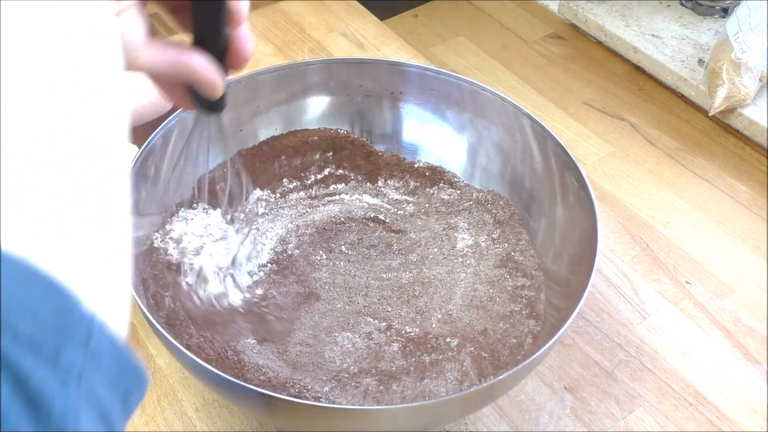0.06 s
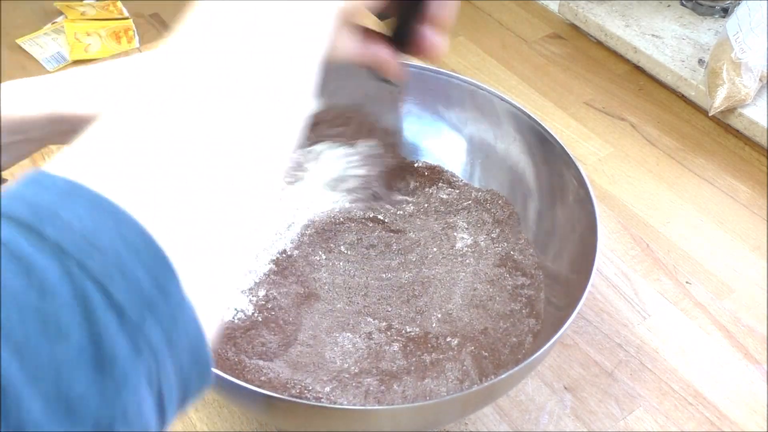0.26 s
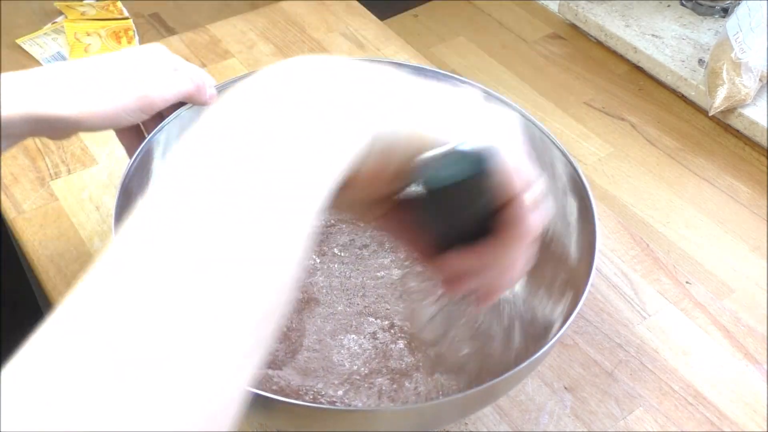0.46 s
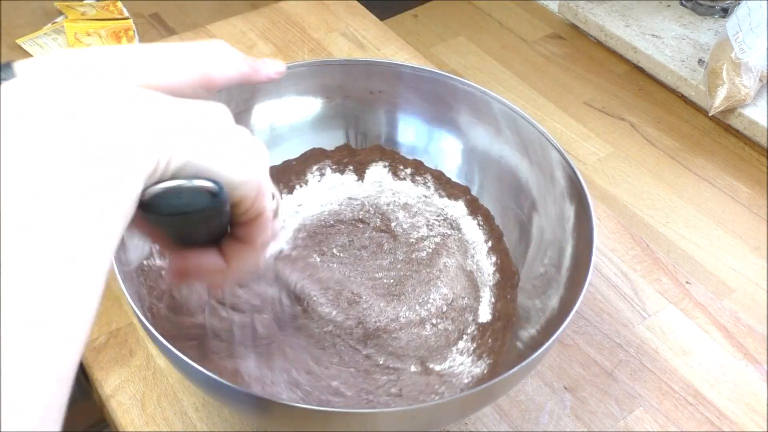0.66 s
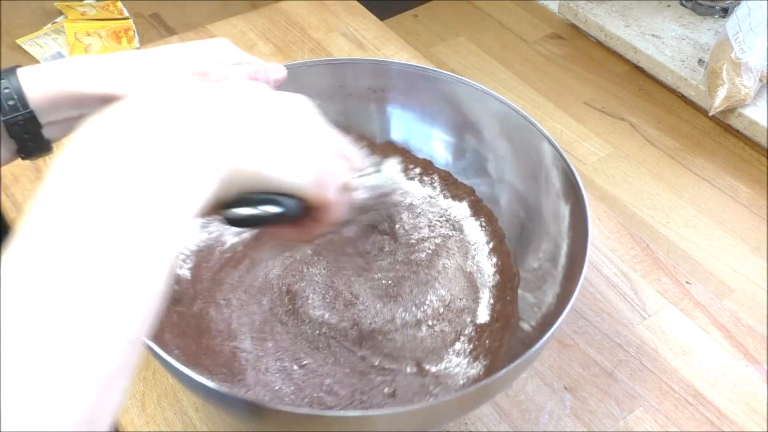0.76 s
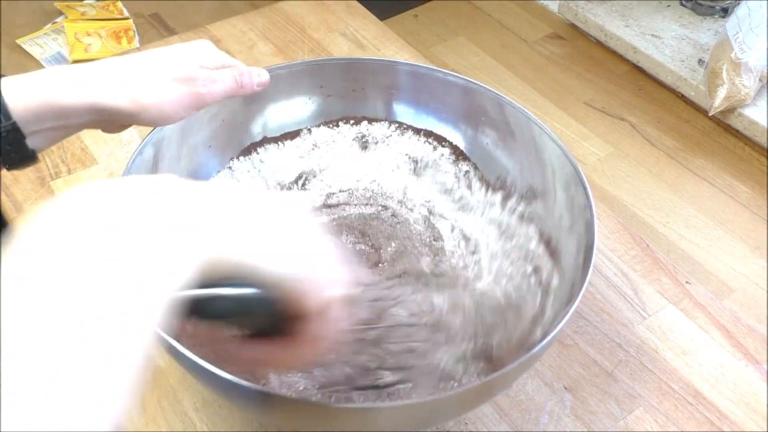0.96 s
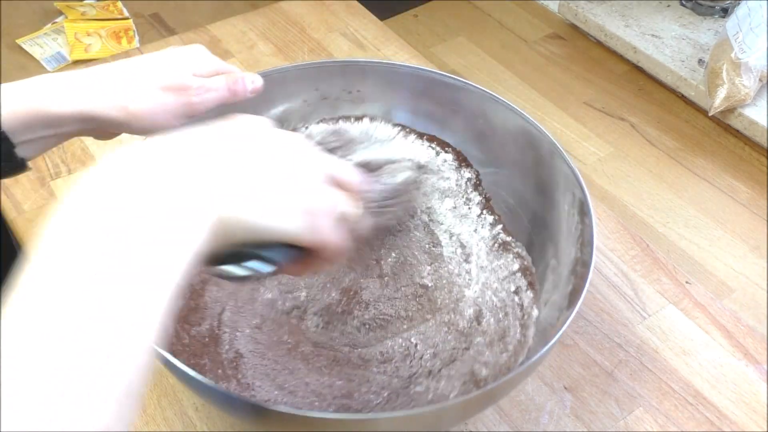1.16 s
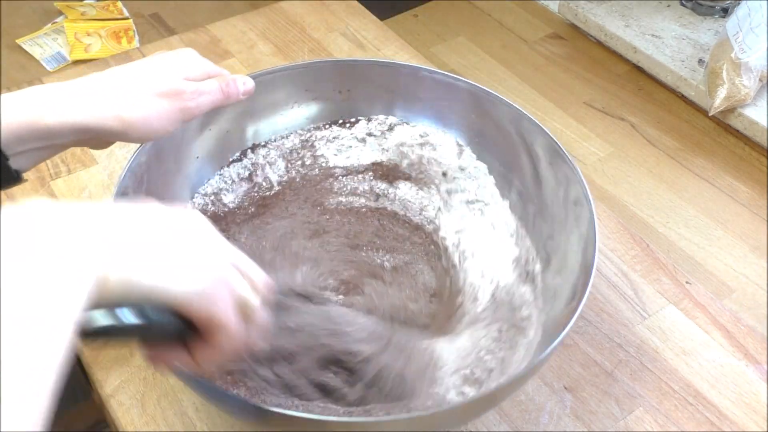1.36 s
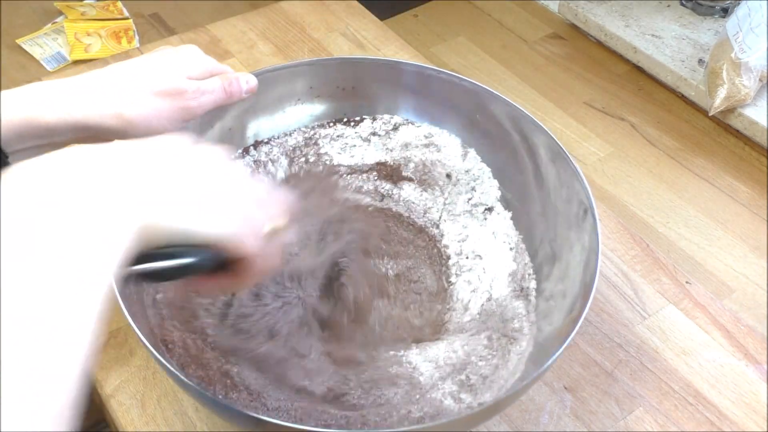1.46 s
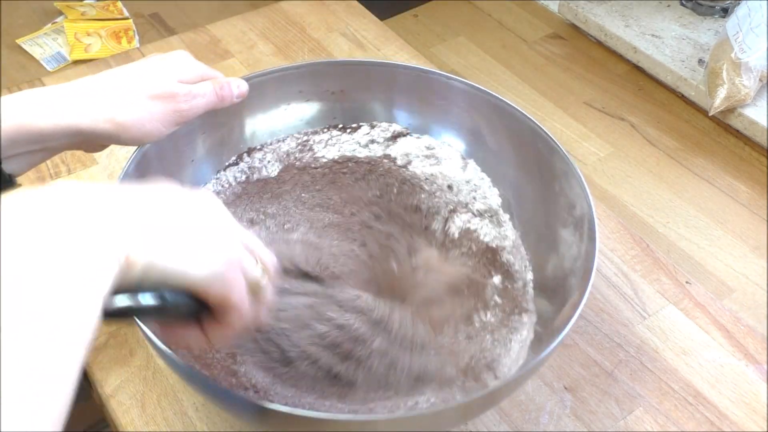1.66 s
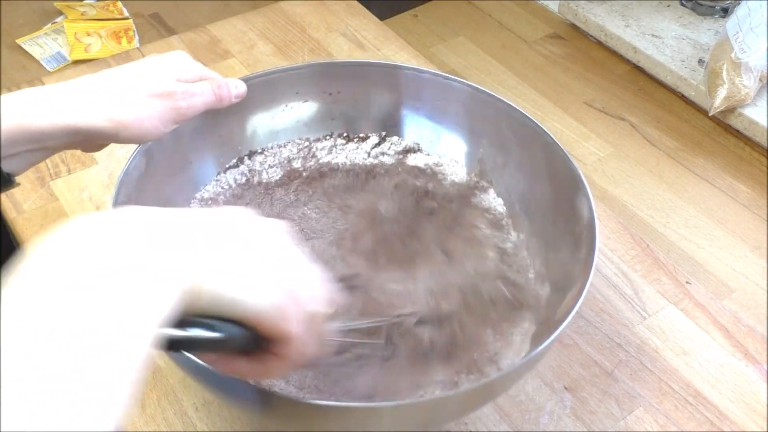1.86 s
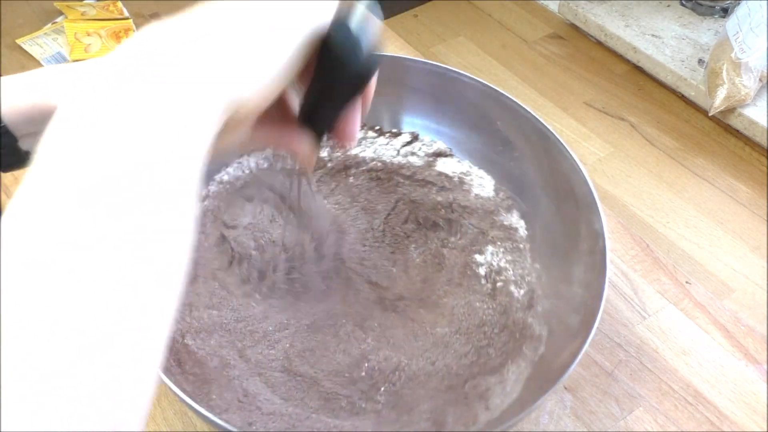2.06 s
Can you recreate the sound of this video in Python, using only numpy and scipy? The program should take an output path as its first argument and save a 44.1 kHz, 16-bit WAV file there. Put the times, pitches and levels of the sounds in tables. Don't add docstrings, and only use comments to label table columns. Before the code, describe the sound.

Close up in a small, quietly humming room, a whisk rasps through dry powder in a metal bowl; light wire ticks lead into fast uneven scrapes, hard clinks, low bowl judders and dull counter thumps, easing at the end.

```python
import sys
import numpy as np
from scipy import signal
from scipy.fft import rfft, irfft
from scipy.io import wavfile
from scipy.ndimage import uniform_filter1d

SR = 44100
rng = np.random.default_rng(int(sys.argv[2]) if len(sys.argv) > 2 else 0)


def invert_db(x):
    u = np.asarray(x, float) / 20
    return 10 ** u


def output_pcm(signal):
    pcm = np.clip(np.atleast_2d(signal).T, -1, 1) * 32767
    wavfile.write(sys.argv[1], SR, np.round(pcm).astype(np.int16))


N = 92610
T = np.arange(N) / SR

# frequency in Hz, level in dB.
KITCHEN_SPECTRUM = [(15, -28), (25, 1.5), (234, -16.5), (298, -4.5), (600, -18.5), (1580, -20), (3450, -26),
                    (6960, -31), (15600, -54)]
# start in seconds, level in dB, panel note in dB relative.
THUMPS = [(0.602, -40.5, 8), (0.697, -37, -9), (0.822, -31, -4.5), (0.888, -39, -4), (0.999, -33.5, 3.5),
          (1.128, -61, 8), (1.2, -43, -15), (1.27, -35.5, 2.5), (1.318, -38, 3), (1.39, -45, -3),
          (1.68, -30.5, 1.5), (1.838, -27, -2.5), (1.923, -32, 6.5), (1.575, -45, 10), (1.71, -28, -7),
          (1.954, -32, 4)]
# start in seconds, hold in seconds, level in dB, pitch in Hz.
JUDDERS = [(0.085, 0.0067, -28, 339), (0.183, 0.041, -37.5, 308.5), (0.394, 0.028, -35.5, 299),
           (0.527, 0.013, -30.5, 363.6), (0.566, 0.13, -23, 300.4), (0.701, 0.02, -24.5, 282),
           (0.748, 0.037, -24, 315), (.785, 0.025, -21, 419), (.79, 0.016, -26, 290),
           (0.854, 0.0055, -20.5, 303), (0.872, 0.016, -21, 333), (0.898, 0.0079, -18.5, 310),
           (0.921, 0.013, -27, 304), (0.992, 0.036, -27.5, 300.6), (1.029, 0.087, -28, 308),
           (1.125, 0.055, -19, 309.4), (1.177, 0.067, -27.5, 319), (1.268, 0.036, -27, 280.5),
           (1.386, 0.049, -30.5, 296), (1.495, 0.019, -27, 338), (1.521, 0.011, -20, 332),
           (1.56, 0.031, -29.5, 307), (1.62, 0.03, -28, 301), (1.678, 0.016, -18, 296),
           (1.724, 0.032, -33, 285), (1.758, 0.048, -24.5, 376), (1.837, 0.038, -17.5, 289),
           (1.917, 0.013, -20, 316), (1.956, 0.039, -33, 320)]
# start in seconds, level in dB, pitch in Hz, hold in seconds.
TICKS = [(.137, -17, 6580, 0.0041), (0.199, -19, 6320, 0.0026), (0.369, -11.5, 6260, .008),
         (0.447, -12, 6300, .008), (.47, -14.5, 6200, 0.028), (0.243, -27, 2650, 0.016),
         (0.341, -11, 6280, 0.0063), (.344, -23, 3880, 0.0066), (.345, -22, 5050, .018),
         (0.409, -13.5, 6220, 0.025), (0.443, -21, 5120, 0.035), (0.465, -27, 2130, 0.0052),
         (0.785, -25, 947, 0.074), (0.791, -26, 1392, 0.038), (0.897, -10, 6300, 0.007),
         (1.129, -23, 3710, 0.012), (1.267, -25, 638, 0.02), (1.398, -18.5, 4580, .012),
         (1.467, -33, 1140, 0.015), (1.502, -18, 6730, 0.0016), (1.48, -19, 2800, .006),
         (1.599, -24, 7150, 0.014), (1.6, -28.5, 5900, 0.011), (1.662, -17, 2780, 0.006),
         (1.661, -15.5, 9460, .006), (1.687, -18, 3940, 0.011), (1.651, -27, 1075, 0.035),
         (1.744, -27, 6800, 0.0081)]
# start in seconds, peak in dB, centre in Hz, ring T60 in seconds.
KNOCKS = [(.2015, -22, 2550, .012), (.2295, -22, 2700, .012), (.2895, -19, 790, 0.011),
          (.2895, -17, 2000, 0.0067), (.3216, -16.5, 2640, 0.015), (.3216, -17, 1820, 0.013),
          (.3216, -20, 3760, 0.014), (.3305, -20, 2750, 0.0087), (.568, -17, 1360, 0.018),
          (.6531, -23, 2690, .01), (.2062, -3, 6500, .007), (.88, 2, 7300, .007), (.8828, -17, 6700, .006),
          (.8862, -17, 7360, 0.0055), (.8943, -4.5, 7800, 0.0099), (1.1925, -11, 7000, .008),
          (1.2072, 3, 7300, .006), (1.2072, -21, 13000, .003), (1.248, -9, 6300, .012),
          (1.2482, -15, 7850, .005), (1.2652, -20, 3370, 0.0079), (1.4592, -16, 3750, 0.011),
          (1.4845, -9, 6150, .008), (1.5002, -11, 7800, 0.0089), (1.5002, -19, 12500, .005),
          (1.5065, -14, 13800, .004), (1.5122, -12, 7200, .005), (1.5235, -8, 7950, 0.0044),
          (1.5235, -16, 12500, .004), (1.617, -11.5, 1890, 0.014), (1.6225, -16, 1770, 0.014),
          (1.6575, -11, 2730, 0.014), (1.6575, -15, 1400, .012), (1.8305, -13, 6900, 0.0086),
          (1.8672, -6, 2015, 0.021), (1.8702, -5, 2900, 0.0082), (1.877, -9, 2700, .01),
          (1.8873, -1.5, 1940, 0.013), (1.8873, -6.5, 2914, 0.015), (1.8873, -7, 3900, 0.0091),
          (1.895, -10, 2800, 0.012), (1.904, -15, 2980, 0.0089)]
# start in seconds, hold in seconds, level in dB, wall clang in dB relative.
STROKES = [(0.08, 0.004, -48.5, 11.5), (0.136, 0.039, -34, -2), (0.198, 0.01, -27, -4),
           (0.221, 0.039, -29.5, -7), (0.322, 0.0091, -23, -12.5), (0.335, 0.075, -20.5, -30),
           (0.391, 0.049, -19.5, -34), (0.445, 0.066, -18.5, -13.5), (0.571, 0.05, -21.5, -8.5),
           (0.636, 0.086, -28, -5.5), (0.721, 0.041, -17, -10), (0.766, 0.043, -24, 0.5),
           (0.852, 0.022, -22.5, -12), (0.883, 0.026, -17, -10.5), (0.922, 0.026, -20, -14.5),
           (1.021, 0.073, -28, -5.5), (1.096, 0.085, -16, -11.5), (1.135, 0.035, -18.5, -11),
           (1.202, 0.011, -30.5, 2.5), (1.257, 0.064, -15, -11.5), (1.394, 0.016, -15, -36),
           (1.451, 0.025, -20.5, -10), (1.48, 0.038, -21, -6.5), (1.581, .01, -28, -8),
           (1.597, 0.017, -22.5, -16), (1.616, 0.03, -34.5, 12), (1.652, 0.019, -25.5, 7.5),
           (1.67, 0.013, -19, -7), (1.681, 0.05, -15, -13.5), (1.724, 0.037, -16, -7),
           (1.828, 0.035, -12.5, -15.5), (1.856, 0.013, -24, 4), (1.894, .045, -37, 7),
           (1.948, 0.049, -41.5, 2.5)]
# time in seconds, level in dB.
POWDER = [(0, -51), (.12, -36.5), (.25, -24), (.315, -26.5), (.36, -21.5), (.55, -24.5), (.85, -22.5),
          (.99, -37), (1.09, -20), (1.23, -25.5), (1.37, -26.5), (1.5, -21.5), (1.57, -34.5), (1.8, -23.5),
          (1.92, -30.5), (2.0, -50), (2.1, -82)]
# frequency in Hz, width in Hz, level in dB.
BRIGHT_MODES = [(5050, 310, -7), (5495, 260, -2), (5928, 350, 5.5), (6225, 264, 1.5), (6547, 400, 4.5),
                (7020, 620, 3), (7540, 300, 0.5), (8210, 800, 1), (8270, 1400, -11), (8800, 600, -40)]
# frequency in Hz, width in Hz, level in dB.
CLANG_MODES = [(711, 146, -4), (995, 110, -0.5), (1169, 100, -3), (1292, 217, -0.5), (1640, 290, -1.5),
               (1980, 290, -0.5), (2427, 354, 0.5), (2780, 200, -1.5), (3150, 277, -1), (3424, 240, -1),
               (3900, 430, 0), (4580, 390, -1.5)]
# frequency in Hz, level in dB.
GRIT_SPECTRUM = [(300, -17.5), (900, -16.5), (4300, -14.5), (6400, -2), (8500, -9.5), (10200, -12.5),
                 (14000, -16), (15800, -18)]

KITCHEN_DB = -40.5
ROOM_T60_S, ROOM_DB, ROOM_DULL_HZ = 0.36, -10.5, 6300
KNOCK_ROOM_DB, JUDDER_ROOM_DB = -5, -10
COUNTER_HZ, COUNTER_T60_S, PANEL_HZ, PANEL_T60_S = 47, 0.29, 152.8, 0.12
JUDDER_T60_S, JUDDER_WIDTH_HZ, OVERTONE_DB, SHOULDER_DB = 0.035, 16, -16, -4
TICK_T60_S, TICK_ATTACK_S, TICK_WAVER, TICK_ROUGH_DB = 0.022, 0.002, 0.011, 3.5
KNOCK_RISE_CYCLES, KNOCK_TAIL_DB, KNOCK_TAIL_TIMES = 1.5, -14, 2.5
STROKE_ATTACK_S, STROKE_T60_S = 0.012, 0.1
GRAINS_PER_S, GRAIN_SPREAD_DB = 14000, 1.6
PATCHY_DB, THROB_DB, GRIT_DB = 2.6, 2.0, 2.5
BOWL_HUM_DB, RATTLE_TREBLE_DB, POWDER_CLANG_DB = -16, -15.5, -14.5
CLUMP_DB, CLUMP_BINS, CLUMP_FRAMES = 3, 3, 7


def unit(x):
    return x / np.sqrt(np.mean(x ** 2))


def noise():
    return rng.standard_normal(N)


def band(x, hz, width_hz):
    return signal.lfilter(*signal.iirpeak(hz, hz / width_hz, fs=SR), x)


def colour(x, spectrum):
    hz, db = np.array(spectrum, float).T
    f = np.maximum(np.arange(N // 2 + 1) * SR / N, 1)
    gain = invert_db(np.interp(np.log(f), np.log(hz), db))
    return unit(irfft(rfft(x) * gain, N))


def walk(rate_hz):
    k = int(SR / rate_hz)
    steps = np.repeat(rng.standard_normal(N // k + 1), k)
    return unit(uniform_filter1d(steps, k)[:N])


def shape(start_s, hold_s, t60_s, attack_s):
    rise = np.sin(np.pi / 2 * np.clip((T - start_s) / attack_s + 0.5, 0, 1)) ** 2
    return rise * invert_db(-60 * np.clip(T - start_s - hold_s, 0, 2) / t60_s)


def ring(start_s, hz, t60_s):
    u = np.clip(T - start_s, 0, 2)
    return np.sin(2 * np.pi * hz * u) * invert_db(-60 * u / t60_s)


def kitchen_hum():
    level = invert_db(KITCHEN_DB + 2.0 * walk(5.0))
    return level * colour(noise(), KITCHEN_SPECTRUM)


def kitchen_tail(x):
    u = T[:SR // 2]
    tail = signal.lfilter(*signal.butter(1, ROOM_DULL_HZ, fs=SR), rng.standard_normal(len(u)))
    tail = tail * invert_db(-60 * u / ROOM_T60_S) * (u > 0.004)
    return signal.fftconvolve(x, tail / np.sqrt(np.sum(tail ** 2)))[:N]


def counter_thumps():
    out = 0
    for start_s, db, panel_db in THUMPS:
        soft = 1 - np.exp(-np.clip(T - start_s, 0, 2) / 0.0038)
        counter = ring(start_s, COUNTER_HZ, COUNTER_T60_S)
        panel = invert_db(panel_db) * ring(start_s, PANEL_HZ, PANEL_T60_S)
        out = out + 2 * invert_db(db) * soft * (counter + panel)
    return out


def bowl_judder():
    out = 0
    waver = np.cumsum(walk(40)) / SR
    shake = invert_db(1.6 * walk(70))
    shoulder = invert_db(SHOULDER_DB) * unit(band(noise(), 344, 105))
    for start_s, hold_s, db, hz in JUDDERS:
        phase = 2 * np.pi * (hz * (T - start_s) + JUDDER_WIDTH_HZ / 2 * waver)
        tone = 1.5 * shake * (np.sin(phase) + invert_db(OVERTONE_DB) * np.sin(2 * phase))
        env = shape(start_s, hold_s, JUDDER_T60_S, STROKE_ATTACK_S)
        out = out + invert_db(db) * env * (tone + shoulder)
    return out


def wire_ticks():
    out = 0
    waver = np.cumsum(walk(300)) / SR
    shake = invert_db(TICK_ROUGH_DB * walk(250) - TICK_ROUGH_DB / 2)
    for start_s, db, hz, hold_s in TICKS:
        tone = np.sin(2 * np.pi * hz * (T - start_s + TICK_WAVER * waver))
        out = out + invert_db(db) * shape(start_s, hold_s, TICK_T60_S, TICK_ATTACK_S) * tone
    return out * shake


def wire_knocks():
    out = 0
    rough = noise()
    for start_s, db, hz, t60_s in KNOCKS:
        u = np.clip(T - start_s, 0, 1)
        rise = 1 - np.exp(-u * hz / KNOCK_RISE_CYCLES)
        decay = invert_db(KNOCK_TAIL_DB - 60 * u / (KNOCK_TAIL_TIMES * t60_s))
        tail = unit(band(rough, hz, hz / 4)) * decay
        out = out + invert_db(db) * rise * (1.62 * ring(start_s, hz, t60_s) + tail)
    return out


def grains(rate_hz):
    size = invert_db(GRAIN_SPREAD_DB * rng.exponential(size=N)) * noise()
    return unit(size * (rng.random(N) < rate_hz / SR))


def clumps(x):
    z = signal.stft(x, nperseg=256)[2]
    field = uniform_filter1d(rng.standard_normal(z.shape), CLUMP_BINS, axis=0)
    field = uniform_filter1d(field, CLUMP_FRAMES, axis=1)
    return unit(signal.istft(z * invert_db(CLUMP_DB * unit(field)), nperseg=256)[1][:N])


def steel_modes(x, table):
    out = 0
    for hz, width_hz, db in table:
        drive = x * invert_db(PATCHY_DB * walk(60))
        out = out + invert_db(db) * unit(band(band(drive, hz, width_hz), hz, 2 * width_hz))
    return unit(out)


def scrape_powers():
    grit = invert_db(np.interp(T, *np.array(POWDER).T)) ** 2
    clang = grit * invert_db(POWDER_CLANG_DB) ** 2
    for start_s, hold_s, db, clang_db in STROKES:
        env = shape(start_s, hold_s, STROKE_T60_S, STROKE_ATTACK_S) ** 2
        grit = grit + env * invert_db(db) ** 2
        clang = clang + env * invert_db(db + clang_db) ** 2
    return grit, clang


def grit_scrape():
    grit_power, clang_power = scrape_powers()
    grit = grains(GRAINS_PER_S) * invert_db(THROB_DB * walk(220))
    crunch = clumps(colour(grains(GRAINS_PER_S) + grit, GRIT_SPECTRUM))
    crunch_level = invert_db(GRIT_DB + THROB_DB / 2 * walk(59.95))
    bright = unit(steel_modes(grit, BRIGHT_MODES) + crunch_level * crunch)
    bowl_hum = invert_db(BOWL_HUM_DB) * unit(band(band(noise(), 309.4, 56), 321, 110))
    clang = steel_modes(grains(GRAINS_PER_S / 3), CLANG_MODES)
    rattle = invert_db(RATTLE_TREBLE_DB) * unit(band(grit, 10800, 4200))
    return np.sqrt(grit_power) * (bright + bowl_hum) + np.sqrt(clang_power) * (clang + rattle)


def scene():
    steel, base = grit_scrape(), bowl_judder()
    wires = wire_ticks() + wire_knocks()
    room = kitchen_tail(steel + invert_db(KNOCK_ROOM_DB) * wires + invert_db(JUDDER_ROOM_DB) * base)
    return (steel + wires + base + counter_thumps() + invert_db(ROOM_DB) * room + kitchen_hum())[None]


def low_pass(x):
    return signal.sosfilt(signal.butter(12, 15760, fs=SR, output="sos"), x)


def record(dry):
    rounded = 1.07 * np.tanh(dry / 1.13)
    lowpass = signal.ellip(8, 0.5, 60, 15750, fs=SR, output="sos")
    return low_pass(signal.sosfilt(lowpass, rounded))


dry = scene()
out = record(dry)
output_pcm(out)
```